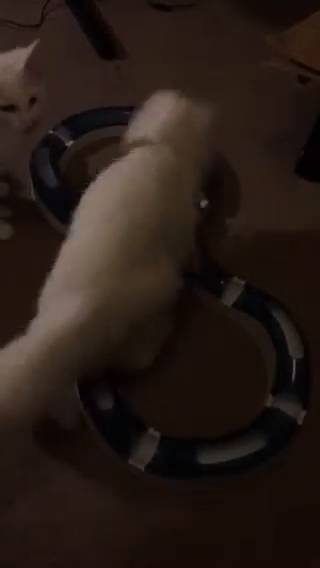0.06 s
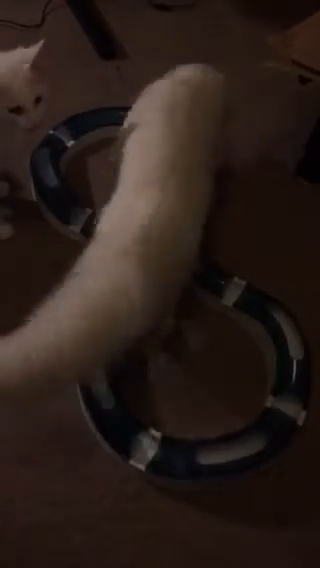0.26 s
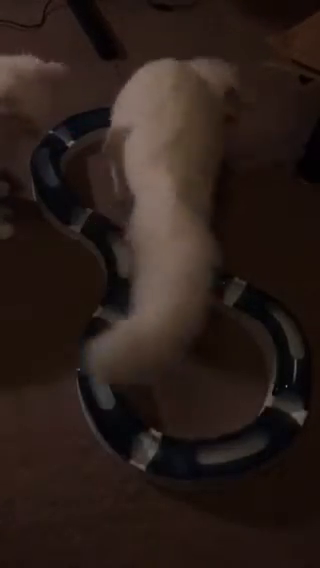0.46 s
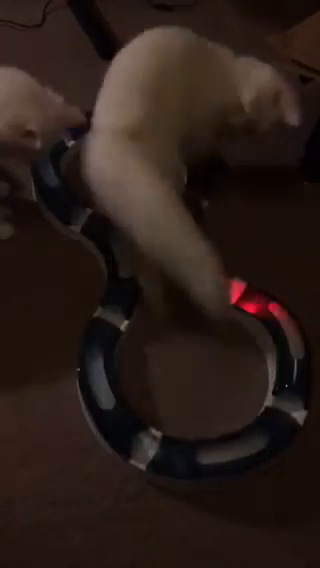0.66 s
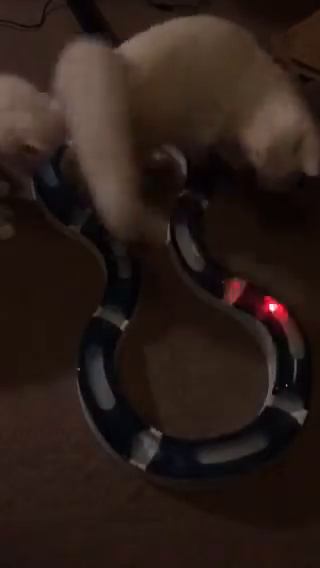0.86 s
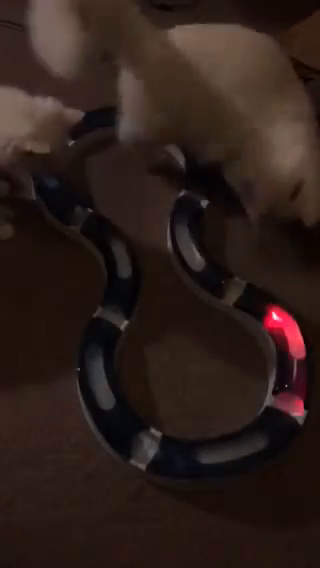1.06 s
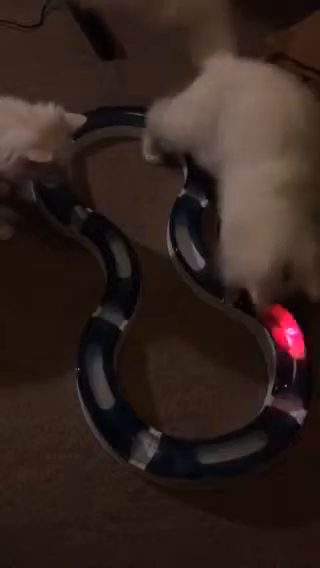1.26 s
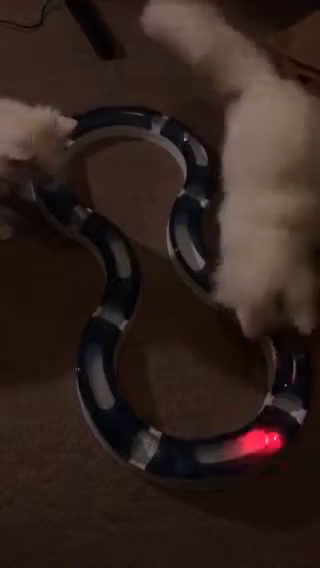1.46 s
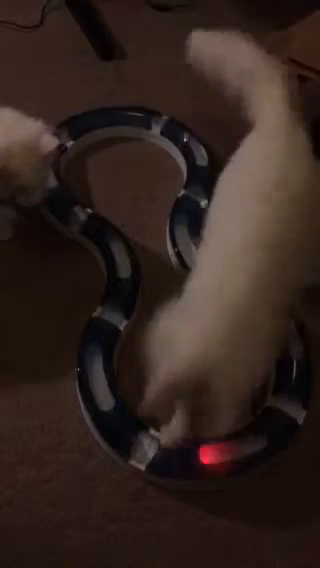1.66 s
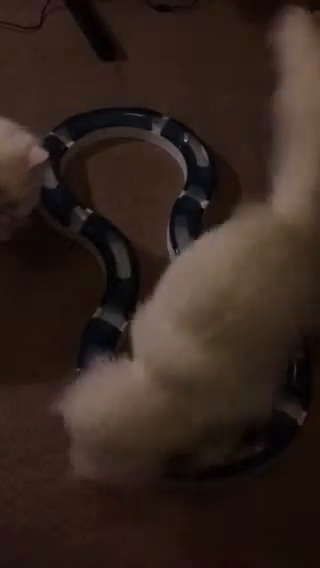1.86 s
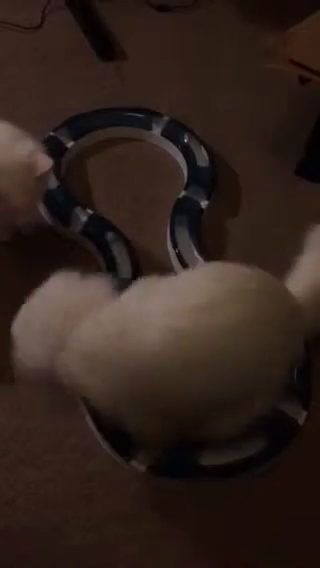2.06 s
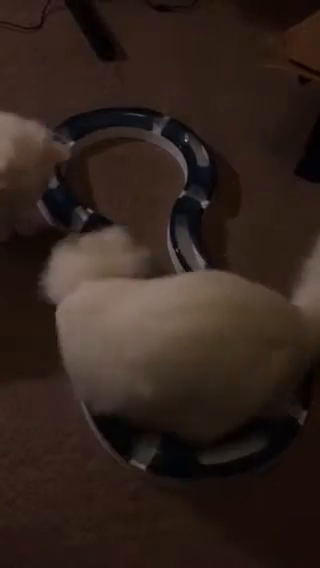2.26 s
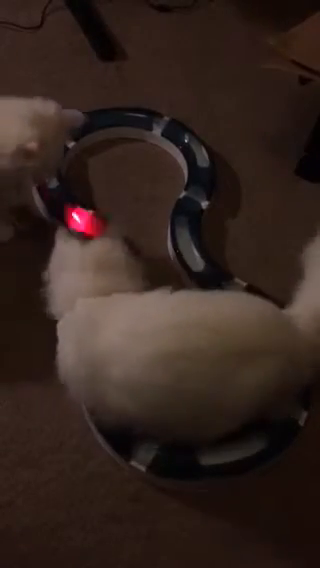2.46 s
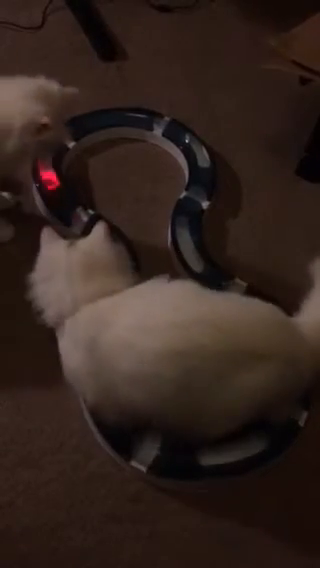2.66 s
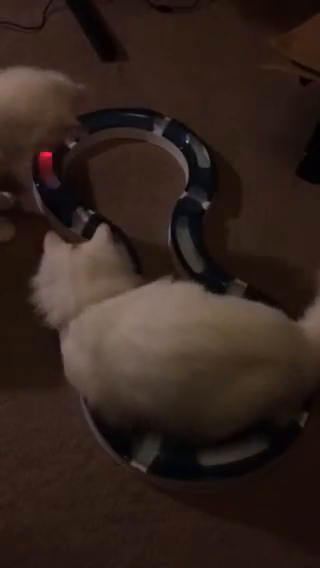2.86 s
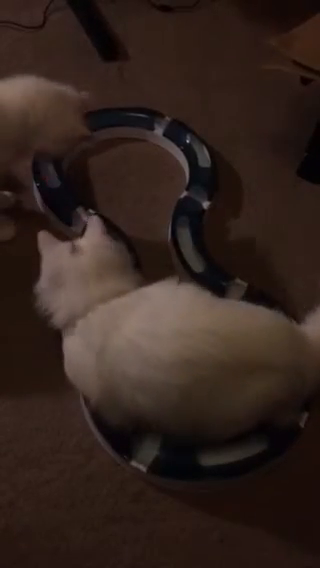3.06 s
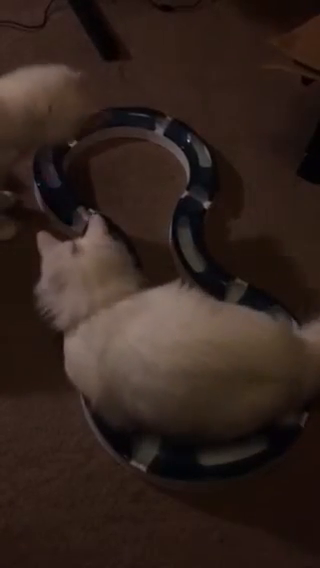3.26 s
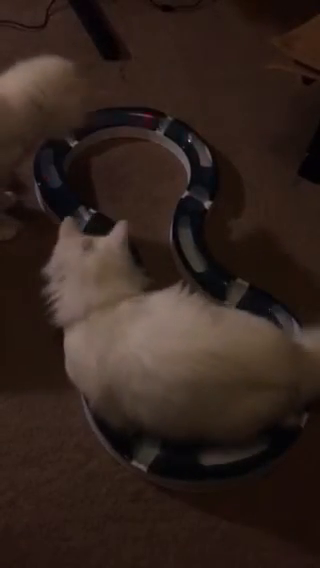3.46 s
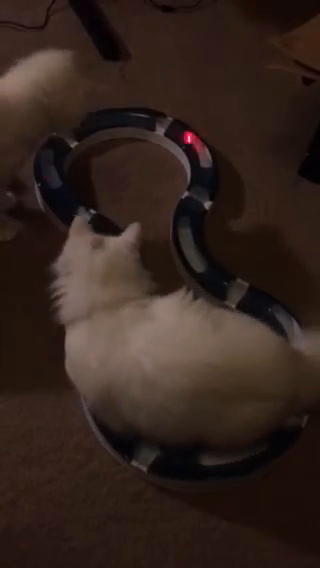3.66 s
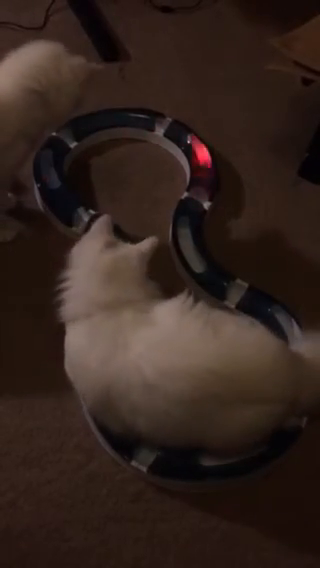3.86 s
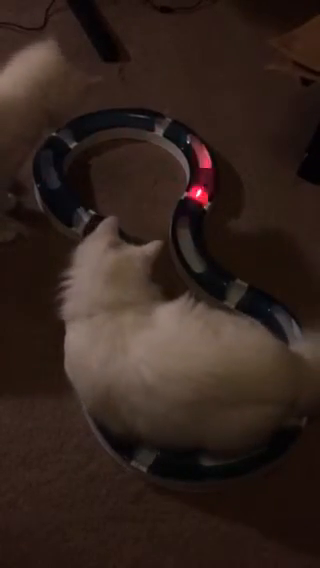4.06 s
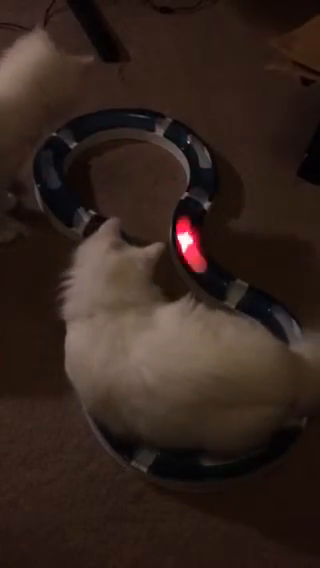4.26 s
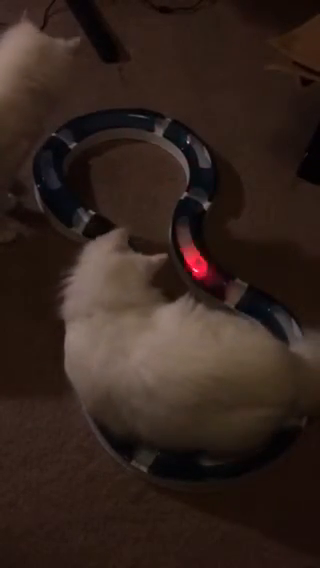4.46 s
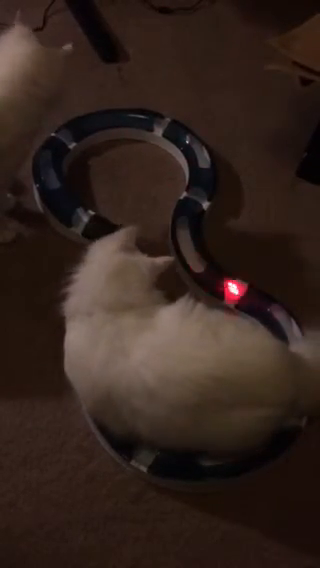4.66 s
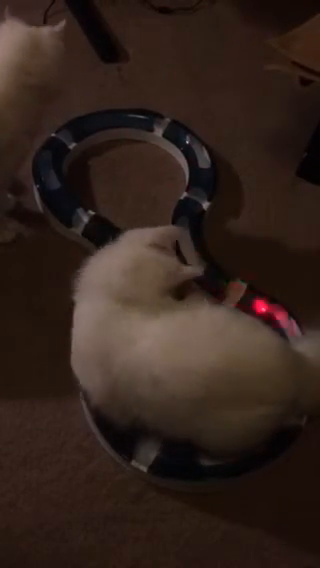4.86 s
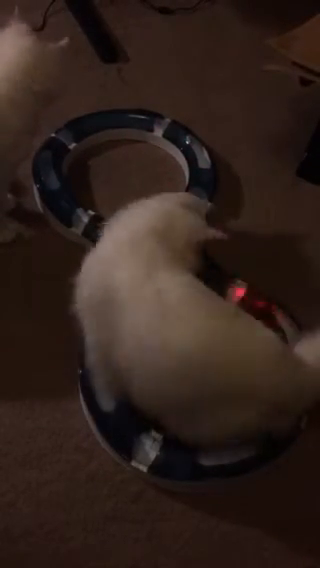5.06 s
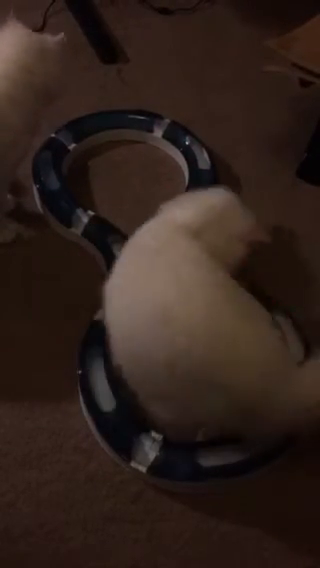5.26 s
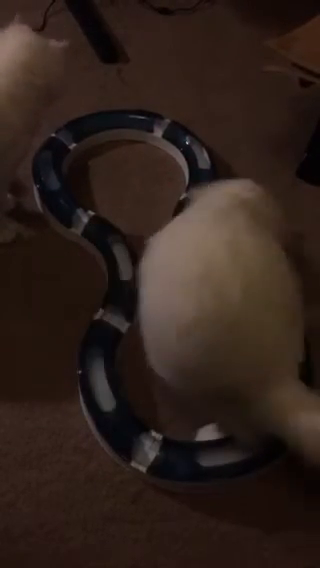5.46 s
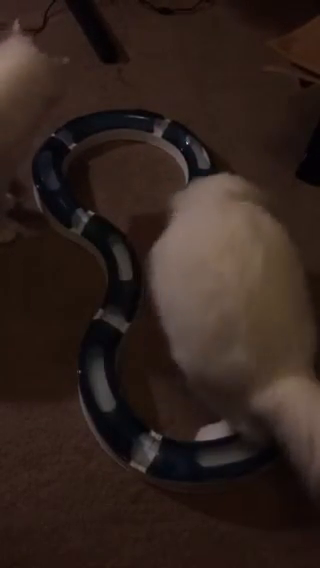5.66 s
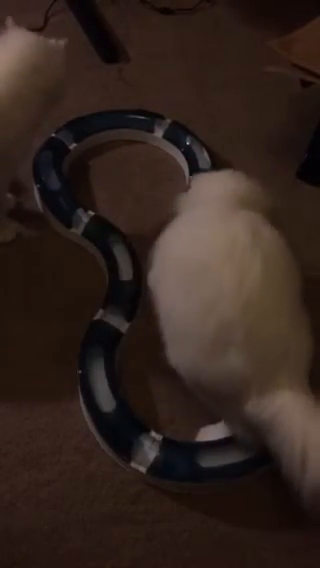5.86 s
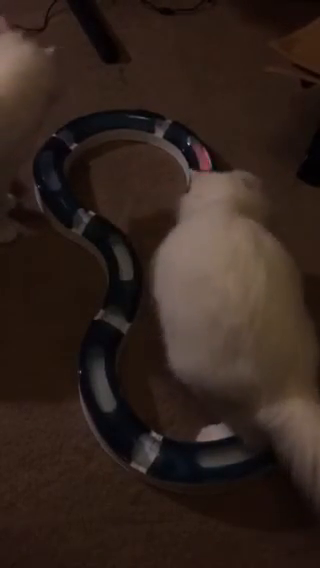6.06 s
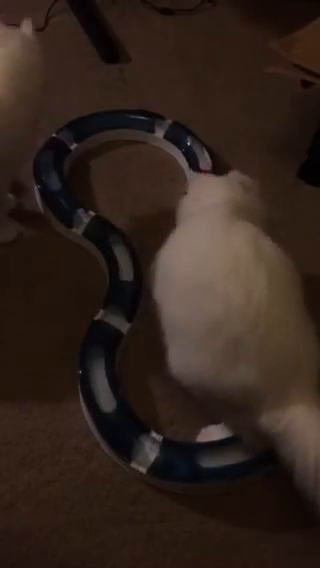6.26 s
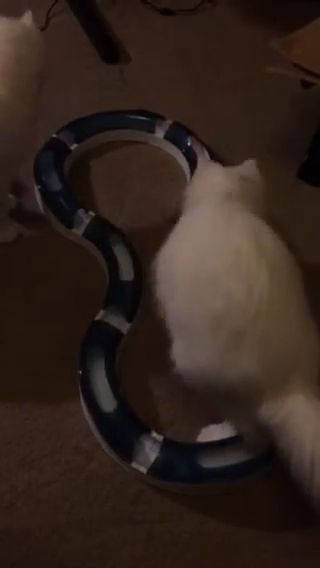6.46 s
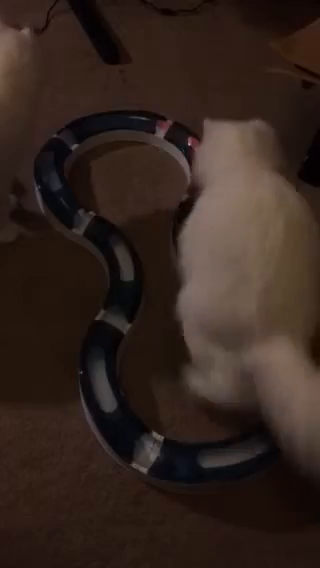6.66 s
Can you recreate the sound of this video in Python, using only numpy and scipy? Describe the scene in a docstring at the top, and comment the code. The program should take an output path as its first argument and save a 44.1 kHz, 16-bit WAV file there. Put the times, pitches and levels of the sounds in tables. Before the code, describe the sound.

A hollow plastic ball is batted around a track toy on carpet, clattering sharply, then rolling away with faint ticks, rattles and soft paw thuds.

```python
"""A paw scrapes and brushes plastic over a faint low rumble; then a hollow ball is batted round a closed
plastic track that lies on a carpet in a quiet room.
The ball clatters between rails, ticks over seams and scrapes briefly: decaying modes and noise spikes.
It hums, rattles and rumbles as it rolls: random grains shaped by spectra and resonances. Paws, and at the
end the ball, thud (damped sines); paws rub (noise strokes) over steady hiss and a wandering rumble."""
import sys
import numpy as np
from scipy import signal
from scipy.fft import rfft, irfft, next_fast_len
from scipy.io import wavfile
from scipy.ndimage import map_coordinates

SR = 44100
rng = np.random.default_rng(int(sys.argv[2]) if len(sys.argv) > 2 else 0)


def dump(signal):
    """Clip the signal to [-1, 1] and save it as 16-bit WAV at the path in sys.argv[1]."""
    limited = np.clip(np.atleast_2d(signal).T, -1, 1)
    pcm = np.round(limited * 32767).astype(np.int16)
    wavfile.write(sys.argv[1], SR, pcm)


N = 295452
BLOW_T_S = np.arange(int(.06 * SR)) / SR

# resonances of the plastic track, relative levels: mode_hz, level_db, t60_s
TRACK_MODES = [(452, -13.5, 0.046), (636, -5.5, 0.039), (823, 4, 0.0092), (1080, -0.5, 0.012),
               (1381, -0.5, 0.022), (1548, 3, 0.013), (1813, -11, 0.02), (1978, 2, 0.0084),
               (2350, -6, 0.035), (2540, -1.5, 0.015), (2920, -0.5, 0.0052), (3075, 1.5, 0.0086),
               (3580, -6, 0.009), (4410, -12.5, 0.014), (4730, -12.5, 0.008)]


def amp(db):
    """Decibels to gain."""
    return 10 ** (np.asarray(db) / 20)


def unit(x):
    """Scale to rms 1."""
    return x / np.sqrt(np.mean(x ** 2) + 1e-20)


def unit_onset(x):
    """Scale a blow to rms 1 over its first 6 ms."""
    onset = x[:int(.006 * SR)]
    return x / np.sqrt(np.mean(onset ** 2) + 1e-20)


def along(points, hz):
    """Interpolate (hz, value) points on a log frequency axis."""
    point_hz, values = np.transpose(points)
    return np.interp(np.log(hz + 1), np.log(point_hz + 1), values)


def coloured(x, spectrum):
    """Shape x by (hz, db) points, with 12 dB per octave more fall outside them; rms 1."""
    m = next_fast_len(len(x) + 2048)
    hz = np.fft.rfftfreq(m, 1 / SR)
    lowest_hz, highest_hz = spectrum[0][0], spectrum[-1][0]
    beyond = np.maximum(1, np.maximum(hz / highest_hz, lowest_hz / (hz + 1)))
    gain = amp(along(spectrum, hz)) / beyond ** 2
    return unit(irfft(rfft(x, m) * gain, m)[:len(x)])


def grains(rate_per_s, spread_db, smooth):
    """Tiny random contacts plus a share of smooth noise; rms 1."""
    taps = (rng.random(N) < rate_per_s / SR) * rng.choice([-1, 1], N)
    taps = taps * amp(spread_db * np.clip(rng.standard_normal(N), -2, 2))
    return unit(unit(taps) + smooth * rng.standard_normal(N))


def wobble(knots_per_s):
    """A smooth random curve through normally distributed knots."""
    knots = rng.standard_normal(int(N * knots_per_s / SR) + 4)
    return map_coordinates(knots, [np.arange(N) * knots_per_s / SR])


def mode(hz, t60_s, attack_s):
    """One damped resonance after a blow."""
    decay = amp(-60 * BLOW_T_S / t60_s)
    return np.sin(2 * np.pi * hz * BLOW_T_S) * decay * (1 - np.exp(-BLOW_T_S / attack_s))


def add(track, start_s, sound):
    """Mix a sound into the track in place."""
    room_left = track[max(0, round(start_s * SR)):][:len(sound)]
    room_left += sound[:len(room_left)]


def in_room(sound, wet_db, early_db):
    """Direct sound, a few near reflections and a diffuse tail whose decay depends on frequency."""
    # decay of the room: band_hz, t60_s
    room_decay = [(200, 0.28), (1000, 0.22), (3000, 0.35), (7000, 0.38), (14000, 0.26)]
    hz, t, z = signal.stft(rng.standard_normal(int(.4 * SR)), SR, nperseg=256)
    decay = amp(-60 * t / along(room_decay, hz)[:, None])
    tail = signal.istft(z * decay, SR, nperseg=256)[1]
    tail *= 1 - np.exp(-np.arange(len(tail)) / SR / 0.00067)
    answer = amp(wet_db) * tail / np.linalg.norm(tail)
    # floor and furniture send back a few weak copies
    delays = (rng.uniform(.003, 0.012, size=6) * SR).astype(int)
    answer[delays] += amp(early_db) * rng.uniform(-1.0, 1, size=6)
    answer[0] += 1  # direct sound
    return signal.fftconvolve(sound, answer)


def clatter():
    """Hits mostly ring the shell, ticks mostly knock the track; harder contacts add rails and edges."""
    # batted ball against a rail: start_s, level_db, shell_hz, hardness (0 dull bump, 1 sharp edge)
    hits = [(.434, -48, 1580, 0.86), (.481, -38.5, 1210, 0.74), (0.533, -37.5, 1440, 0.62),
            (.554, -38.5, 1040, .55), (.574, -43, 830, 0.54), (0.614, -40.5, 1085, .52),
            (.763, -31.5, 1280, 0.53), (.809, -43.5, 770, .35), (.83, -40, 780, 0.36),
            (.85, -49.5, 756, .02), (.933, -48.5, 820, 0), (1.212, -47.5, 960, 0), (1.274, -39, 1130, 0.36),
            (1.278, -40.5, 930, 0.64), (1.282, -38.5, 979, 0.36), (1.345, -19, 1144, 0.74),
            (1.372, -30.5, 1470, .35), (1.391, -43.5, 1330, .95), (1.409, -23, 1230, 0.19),
            (1.419, -28, 1000, 0.45), (1.422, -30, 1020, 0.36), (1.447, -31.5, 1080, .62),
            (1.474, -33, 910, 0.52), (1.495, -34.5, 970, 0.51), (1.542, -38, 1100, .65),
            (1.569, -31.5, 1015, 0.55), (1.579, -35, 1000, 0.45), (1.606, -34, 980, 0),
            (1.672, -35, 1010, 0.083), (1.773, -44, 1160, 0.86), (1.776, -28, 1330, 0.23),
            (1.793, -25.5, 970, 0.24), (1.821, -40.5, 830, 0.64), (1.852, -34.5, 1200, .42),
            (1.89, -36, 815, 0.55), (1.9, -45, 740, 0.37), (1.933, -40, 850, 0.43),
            (1.959, -42.5, 1060, 0.2), (2.007, -41, 1020, 0.34), (2.148, -38, 1055, 0.12),
            (2.219, -41, 1030, 0.036), (2.25, -40.5, 980, 0.47), (2.262, -40.5, 1730, 0.86),
            (2.287, -42, 1230, 0.59), (2.602, -45.5, 860, 0.32), (2.674, -46, 800, 0.18),
            (2.815, -43.5, 920, 0), (2.825, -46, 881, 0), (2.996, -49, 1057, 0.026), (3.02, -50.5, 950, 0),
            (3.122, -51, 740, 0.12)]
    # rolling ball ticks over seams; near 3.2 s a short scrape around 2 kHz:
    # start_s, knock_db, shell_hz, hardness (0-1)
    ticks = [(0.279, -47, 800, 0.51), (2.32, -48, 1920, 0.6), (2.361, -38.5, 1180, 0.45),
             (2.41, -42.5, 882, 0.47), (2.475, -54, 990, 0.43), (2.51, -54, 1030, 0.44),
             (2.567, -46, 1150, 0.65), (2.595, -45.5, 1200, 0.47), (3.129, -54, 1280, 0.62),
             (3.183, -48.5, 1820, 0.37), (3.212, -56, 1910, .1), (3.314, -56.5, 990, 0.62),
             (3.409, -60, 1160, 0.65), (3.432, -50.5, 1310, 0.49), (3.517, -52, 1450, 0.55),
             (3.612, -56, 970, 0.58), (3.697, -55.5, 1240, 0.64), (3.72, -49.5, 1330, 0.63),
             (3.826, -45, 1370, 0.44), (3.943, -47, 1010, 0.54), (4.048, -52.5, 840, 0.51),
             (4.167, -50.5, 780, 0.48), (4.233, -55.5, 1120, 0.68), (4.27, -57.5, 1050, 0.52),
             (4.37, -45.5, 1130, 0.67), (4.395, -45, 1120, 0.53), (4.505, -52, 890, 0.53),
             (4.627, -48, 1420, 0.51), (4.746, -51.5, 1340, 0.48), (4.82, -53, 710, .55),
             (4.866, -52.5, 910, 0.54), (4.885, -57, 810, 0.06), (4.979, -61.5, 1030, 0),
             (5.014, -63, 710, 0), (5.328, -55.5, 1390, 0.52), (5.347, -44.5, 1240, 0.45),
             (5.436, -56.5, 1220, .15), (5.457, -56, 1410, 0.69), (5.491, -53, 1470, 0.42),
             (5.643, -47.5, 1260, 0.38), (5.674, -47, 1560, 0.64), (5.735, -49.5, 1220, 0.66),
             (5.794, -55.5, 1070, 0), (5.987, -52.5, 666, 0.55), (5.998, -51, 1290, 0.47),
             (6.151, -62.5, 1090, 0.35), (6.361, -65.5, 920, .15), (6.612, -69, 1100, 0)]
    # each part: dB for a dull 0 dB hit, dB per dB of level, dB gained at hardness 1
    # the carpet holds the track: its knock grows slowly with the blow, up to a limit
    knock_base_db, knock_growth, knock_rise_db, knock_max_db = -33, 0.52, 15, -34.5
    # the rails flex under a strong blow
    clack_base_db, clack_growth, clack_rise_db = -39, 0.65, 31.5
    edge_base_db, edge_rise_db = -40, 52
    # ticks, against a hit as loud as the tick's knock
    tick_shell_db, tick_clack_db = -0.5, -2.4

    def clack(db, hardness):
        """Rail level of a contact, dB."""
        return clack_base_db + clack_growth * db + clack_rise_db * hardness

    def edge(db, hardness):
        """Edge tick level of a contact, dB."""
        return db + edge_base_db + edge_rise_db * hardness

    out = np.zeros(N)
    for start_s, db, shell_hz, hardness in hits:
        knock_db = min(knock_base_db + knock_growth * db + knock_rise_db * hardness, knock_max_db)
        add(out, start_s, contact(start_s, hardness, shell_hz, db, knock_db,
                                  clack(db, hardness), edge(db, hardness)))
    for start_s, db, shell_hz, hardness in ticks:
        add(out, start_s, contact(start_s, hardness, shell_hz, db + tick_shell_db, db,
                                  tick_clack_db + clack(db, hardness), edge(db, hardness)))
    return out


def contact(start_s, hardness, shell_hz, shell_db, knock_db, clack_db, edge_db):
    """One contact rings the hollow shell, knocks the track, clacks the rails and ticks at an edge."""
    # the farther the ball, the more room is heard: time_s, room_db
    wetness = [(.5, -8), (1.35, -10), (1.8, -5), (2.3, -4), (3.6, -3), (4.8, -7), (6, -9.5)]
    split_hz = 1930  # whole segments knock below it, thin rails clack above
    # a harder (briefer) or stronger blow wakes the higher rail modes, dB per octave
    hardness_tilt_db = 15 * (hardness - 0.49)
    strength_tilt_db = 0.15 * max(shell_db + 40.5, 0)
    tilt_db = hardness_tilt_db + strength_tilt_db
    segments = [row for row in TRACK_MODES if row[0] < split_hz]
    rails = [(hz, db + tilt_db * np.log2(hz / split_hz), t60_s)
             for hz, db, t60_s in TRACK_MODES if hz >= split_hz]

    shell = amp(shell_db) * unit_onset(mode(shell_hz, t60_s=0.0096, attack_s=0.0022))
    knock = amp(knock_db) * struck(segments, detune=.035)
    clack = amp(clack_db) * struck(rails, detune=.03)
    blow = shell + (knock + clack) + amp(edge_db) * edge_tick()
    # the ball hops and settles; its own weight limits how loud a rebound can be
    for hop_s in rng.uniform(.005, .02, size=2):
        hop_knock = amp(min(knock_db - 8, -52)) * struck(segments, detune=0.075)
        hop_clack = amp(min(clack_db - 16.5, -61)) * struck(rails, detune=0.029)
        add(blow, hop_s, hop_knock + hop_clack)
    wet_db = np.interp(start_s, *np.transpose(wetness))
    return in_room(blow, wet_db=wet_db, early_db=-15.5)


def struck(modes, detune):
    """The place of the blow decides how strongly each mode answers and shifts its pitch a little."""
    total = 0
    for hz, db, t60_s in modes:
        gain = rng.choice([-1, 1]) * amp(db + 2 * rng.standard_normal())
        shifted_hz = hz * (1 + detune * rng.standard_normal())
        total = total + gain * mode(shifted_hz, t60_s, attack_s=0.0002)
    return unit_onset(total)


def edge_tick():
    """One sharp spike as a hard edge catches, with a decaying spray of finer ones."""
    # spectrum of the tick: band_hz, level_db
    tick_spectrum = [(2000, 14), (3300, -1), (5200, -2.5), (6400, -2.5), (7400, -2), (8300, -7.5),
                     (9300, -3), (11400, -7.5), (12500, -9.5), (15000, -20)]
    snap = amp(-60 * BLOW_T_S / 0.015) * (1 - np.exp(-BLOW_T_S / .0004))
    spike = 1.7 * signal.unit_impulse(len(BLOW_T_S), 22)
    spray = snap * rng.standard_normal(len(BLOW_T_S))
    return unit_onset(coloured(spike + spray, tick_spectrum))


def rolling():
    """Small bumps under the ball keep its shell humming, rattle the track and rumble through the floor."""
    # shell hum: band_hz, level_db
    hum_spectrum = [(450, -31), (700, -5.5), (850, -0.5), (1000, 2), (1180, -13), (1500, -18.5),
                    (2200, -30.5)]
    # floor rumble: band_hz, level_db
    rumble_spectrum = [(70, -13), (130, -13.5), (190, 7), (245, 3.5), (320, -4), (430, -12), (700, -37)]
    hum_gain, rattle_gain, rumble_gain = run_gains()
    # the ball sways from rail to rail, so its hum comes and goes
    sway_db, sway_per_s = 1, 22
    sway = amp(sway_db * wobble(sway_per_s))
    hum = hum_gain * sway * coloured(grains(rate_per_s=160, spread_db=4.0, smooth=0.25), hum_spectrum)
    rattle = rattle_gain * track_rattle(spot_count=6)
    bumps = grains(rate_per_s=110, spread_db=2.5, smooth=0.93)
    rumble = rumble_gain * coloured(bumps, rumble_spectrum)
    return in_room(hum + rattle, wet_db=-7, early_db=-20)[:N] + rumble


def run_gains():
    """Hum, rattle and rumble swell with each push, fade as the ball slows and die when it stops."""
    # from push until caught or stalled:
    # start_s, end_s, hum_db, rattle_db, rumble_db, slowing_db_per_s
    runs = [(0.482, .62, -81, -81, -55.5, 21), (0.82, .93, -57, -65.5, -59.5, 38),
            (1.365, 1.67, -42.5, -57.5, -55, 14), (1.832, 2.055, -55, -55, -49.5, 27),
            (2.162, 2.474, -50, -67, -57, 49), (2.547, 3.087, -64.5, -77.5, -58.5, 5),
            (3.137, 4.893, -72.5, -60.5, -60, 2), (5.211, 5.302, -72.5, -74.5, -58.5, 10),
            (5.353, 5.473, -68.5, -57.5, -61, 26), (5.638, 6.696, -72.5, -68.5, -60, 10.5)]
    push_s, stall_s = 0.099, 0.175  # each per 20 dB of swell or dying
    t = np.arange(N) / SR
    gains = np.zeros((3, N))
    for start_s, end_s, hum_db, rattle_db, rumble_db, slowing_db_per_s in runs:
        swell_db = -20 * np.maximum(start_s - t, 0) / push_s
        slowing_db = -slowing_db_per_s * np.maximum(t - start_s, 0)
        stall_db = -20 * np.maximum(t - end_s, 0) / stall_s
        motion = amp(swell_db + slowing_db + stall_db)
        gains = np.maximum(gains, np.outer(amp([hum_db, rattle_db, rumble_db]), motion))
    return gains


def track_rattle(spot_count):
    """Small bumps fall on several spots of the track, each with its own mix of modes; rms 1."""
    # soft bumps dull the track: band_hz, level_db
    rattle_spectrum = [(250, -1.5), (430, 8.5), (620, 2.5), (900, 1), (1500, 0.5), (1900, -3), (2550, -7.5),
                       (3300, -16), (8000, -2.5)]
    total = np.zeros(N)
    for _ in range(spot_count):
        bumps = grains(rate_per_s=20, spread_db=3, smooth=0.3)
        total += signal.fftconvolve(bumps, struck(TRACK_MODES, detune=0.044))[:N]
    return coloured(total, rattle_spectrum)


def rubbing():
    """Fine slips scrape and a noisy hiss brushes under short swells: paw strokes and two bright hits."""
    # paw strokes, and the short bright hiss of two hits (0.434 s, 2.266 s); rise and fall per 20 dB:
    # peak_s, rise_s, fall_s, scrape_db, brush_db, brush_tilt_db_per_octave
    swells = [(0.016, 0.025, 0.098, -51, -76, 1), (.147, 0.046, 0.037, -66, -66, -3),
              (0.196, .04, .04, -52.5, -82, 1), (.247, 0.0072, 0.04, -40, -53.5, 8),
              (.425, 0.086, 0.034, -90, -62, 16), (0.434, 0.0047, 0.019, -59, -39.5, 20.5),
              (.49, 0.19, 0.093, -47, -58.5, -14), (.555, 0.051, 0.15, -47.5, -61, 1.5),
              (.68, 0.078, 0.56, -62.5, -74, 6), (0.979, 0.023, .06, -75, -67.5, 5.5),
              (.997, 0.0054, .023, -54, -90, 3), (1.33, 0.058, 0.046, -43.5, -45.5, 5.5),
              (1.81, 0.031, 0.022, -38.5, -49.5, -3), (1.982, 0.0063, 0.029, -48, -47, -2.5),
              (2.2, 0.065, 0.27, -56.5, -62, 4.5), (2.266, 0.0053, 0.031, -62, -37, -4),
              (2.34, 0.26, 0.54, -60, -75, -4.5), (2.521, .075, 0.081, -59.5, -70, 5.5),
              (3.131, 0.098, 0.062, -54.5, -72.5, 8), (5.107, 0.14, 0.1, -69.5, -71.5, 6),
              (5.48, 0.092, 0.064, -62, -67, 1), (5.68, 0.097, 0.15, -54, -63.5, 0.5),
              (5.996, 0.055, 0.038, -53.5, -85, -2.5), (6.155, .02, 0.064, -63.5, -83.5, -6.5),
              (6.361, 0.012, 0.056, -66, -91.5, -3), (6.608, .023, 0.072, -59, -97.5, 6)]
    # scrape: band_hz, level_db
    scrape_spectrum = [(250, -6.5), (450, -3.5), (620, -2), (880, 2), (1150, -0.5), (1500, 2), (2100, -6),
                       (3000, -13), (4300, -39.5), (8000, -34)]
    # hiss before each swell's tilt: band_hz, level_db
    brush_spectrum = [(1500, -14.5), (3000, 1), (4500, 1), (6500, -3), (8300, -6), (9500, -7.5),
                      (12000, -8), (15000, -18)]
    out = np.zeros(N)
    slips = coloured(grains(rate_per_s=560, spread_db=2.5, smooth=0.78), scrape_spectrum)
    brush = grains(rate_per_s=510, spread_db=4.5, smooth=1)
    for peak_s, rise_s, fall_s, scrape_db, brush_db, tilt_db in swells:
        first = max(0, int((peak_s - 2 * rise_s) * SR))
        last = min(N, int((peak_s + 2 * fall_s) * SR))
        span = np.arange(first, last)
        t = span / SR
        swell = amp(-20 * np.maximum((peak_s - t) / rise_s, (t - peak_s) / fall_s))
        tilted = [(hz, db + tilt_db * np.log2(hz)) for hz, db in brush_spectrum]
        hiss = coloured(brush[span], tilted)
        out[span] += swell * (amp(scrape_db) * slips[span] + amp(brush_db) * hiss)
    return in_room(out, wet_db=-9, early_db=-24)[:N]


def thuds():
    """Paws landing, and at the end the ball softly knocking the track: short damped thuds."""
    # start_s, peak_db, pitch_hz (peak before the room is added); the ball from 6.148 s on
    knocks = [(.283, -38, 97), (0.484, -39, 385), (0.766, -44, 171), (0.925, -40.5, 151), (.946, -43, 75),
              (1.319, -38, 106), (1.807, -38, 196), (1.85, -34, 210), (1.892, -35, 210), (1.955, -38, 210),
              (2.037, -33, 177), (2.139, -46.5, 181), (2.572, -46, 168), (2.675, -48, 133),
              (4.236, -44.5, 300), (4.275, -50.5, 330), (5.219, -47.5, 177), (5.276, -45, 169),
              (5.654, -41, 185), (5.95, -48.5, 209), (6.148, -55.5, 416), (6.346, -55, 412),
              (6.601, -55.5, 440)]
    out = np.zeros(N)
    for start_s, peak_db, pitch_hz in knocks:
        thud = mode(pitch_hz, t60_s=.024, attack_s=.012)
        thud = amp(peak_db) * thud / np.abs(thud).max()
        add(out, start_s, in_room(thud, wet_db=-7.5, early_db=-20.5))
    return out


def background():
    """Faint steady hiss of still room and microphone over a wandering low rumble of the floor."""
    # hiss: band_hz, level_db
    hiss_spectrum = [(59, -34), (100, 1), (156, -7), (188, -18.5), (362, -29), (2470, -34.5), (2690, -32),
                     (3850, -36.5), (5400, -36.5), (11300, -39.5), (15500, -42)]
    # floor rumble: band_hz, level_db
    floor_spectrum = [(25, -36.5), (42, -11), (65, 1.5), (90, 1), (130, -6.5), (200, -11.5), (320, -18)]
    # floor rumble over time: time_s, level_db
    floor_levels = [(0, -57), (.25, -54.5), (.45, -57.5), (.85, -57), (1.1, -62), (2.4, -66), (4.9, -61.5),
                    (5.3, -57), (5.9, -55.5), (6.3, -63)]
    hiss = amp(-64.5) * coloured(rng.standard_normal(N), hiss_spectrum)
    floor_db = np.interp(np.arange(N) / SR, *np.transpose(floor_levels))
    return hiss + amp(floor_db) * coloured(rng.standard_normal(N), floor_spectrum)


def scene():
    """All layers summed at one microphone."""
    return (clatter() + thuds() + rolling() + rubbing() + background())[None]


def record(dry):
    """The recorder keeps nothing above its band limit."""
    top_hz = 15600
    m = next_fast_len(N + SR // 2)
    kept = np.fft.rfftfreq(m, 1 / SR) < top_hz
    return irfft(rfft(dry, m) * kept, m)[..., :N]


dry = scene()
out = record(dry)
dump(out)
```